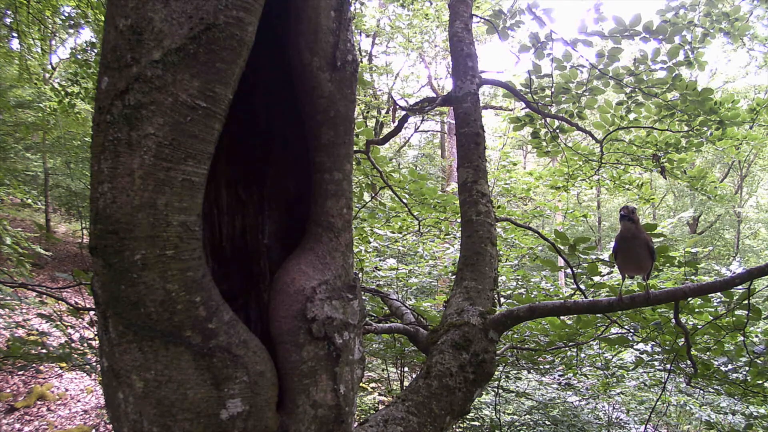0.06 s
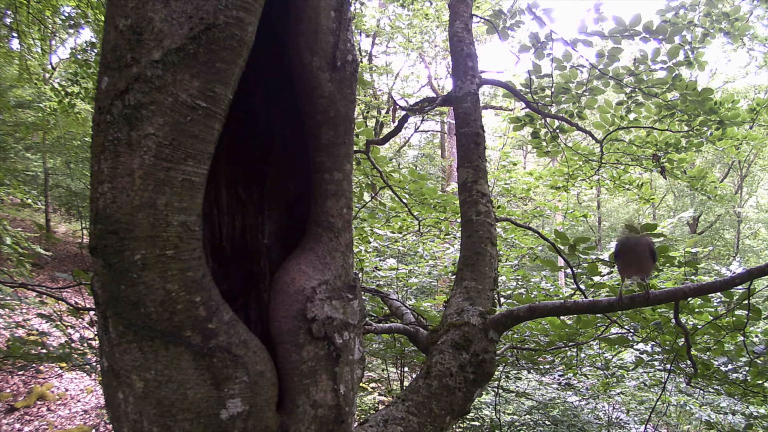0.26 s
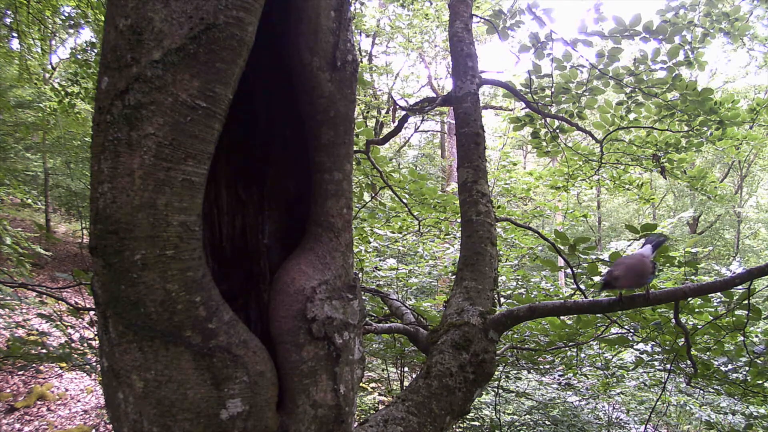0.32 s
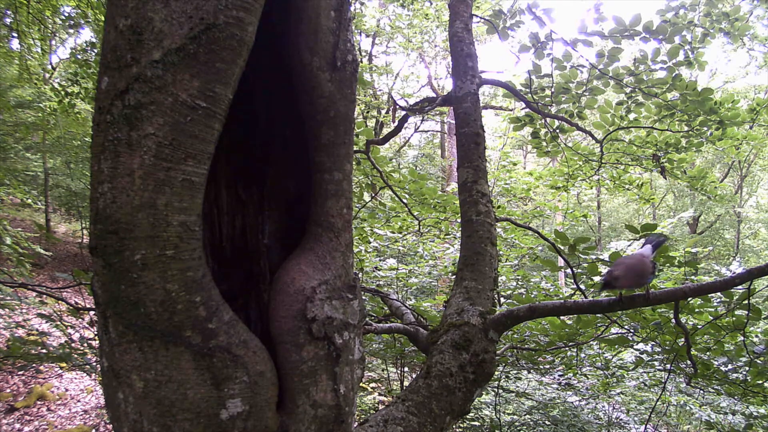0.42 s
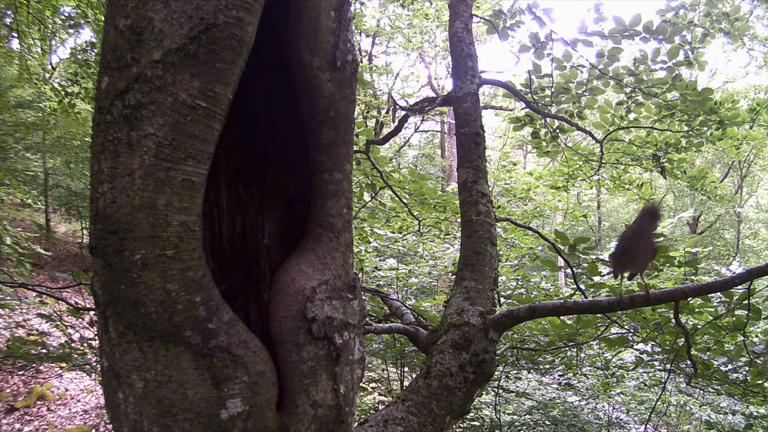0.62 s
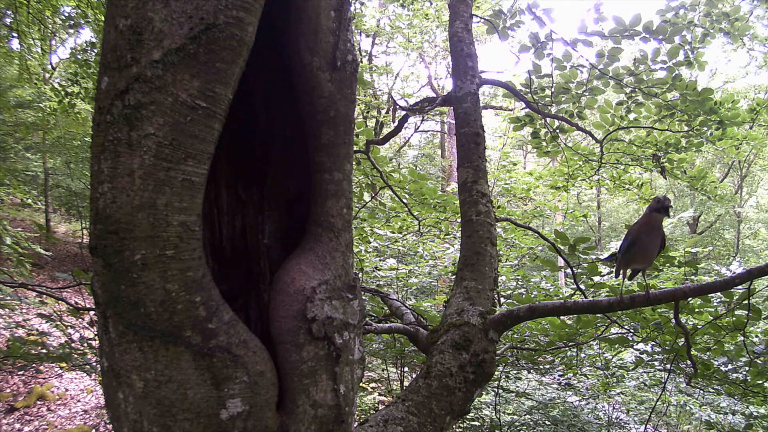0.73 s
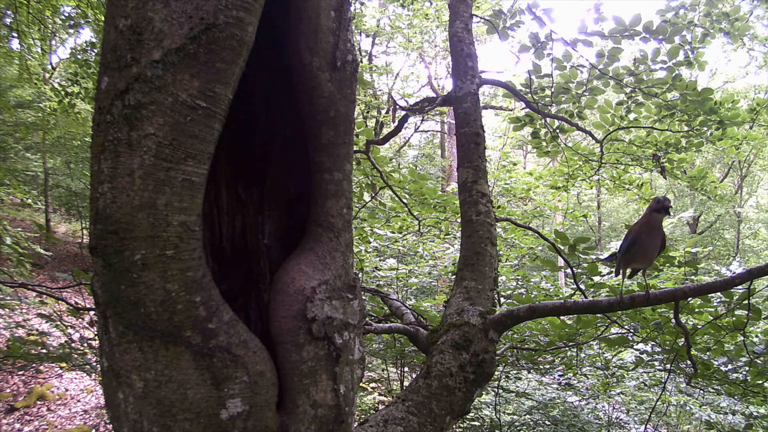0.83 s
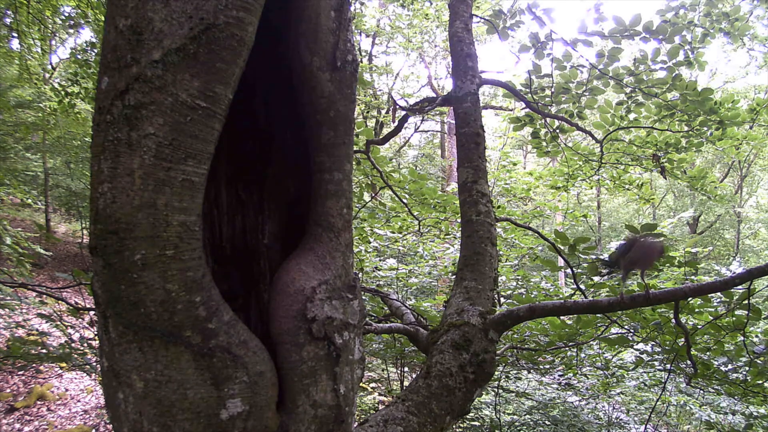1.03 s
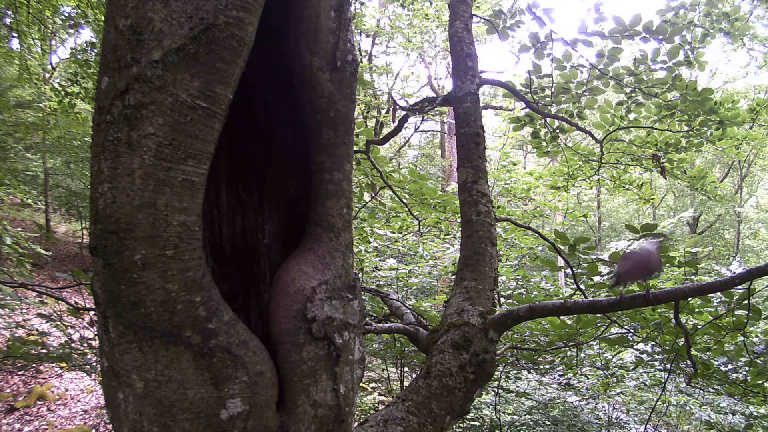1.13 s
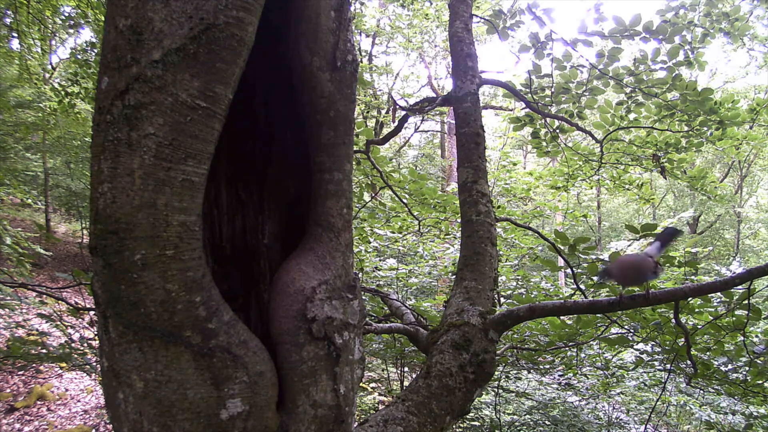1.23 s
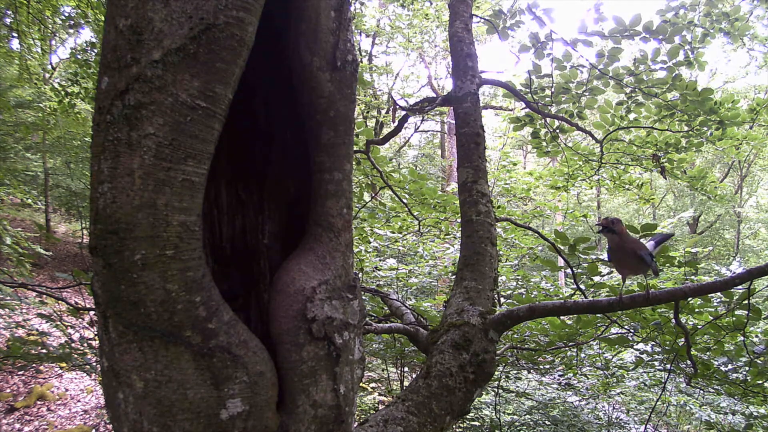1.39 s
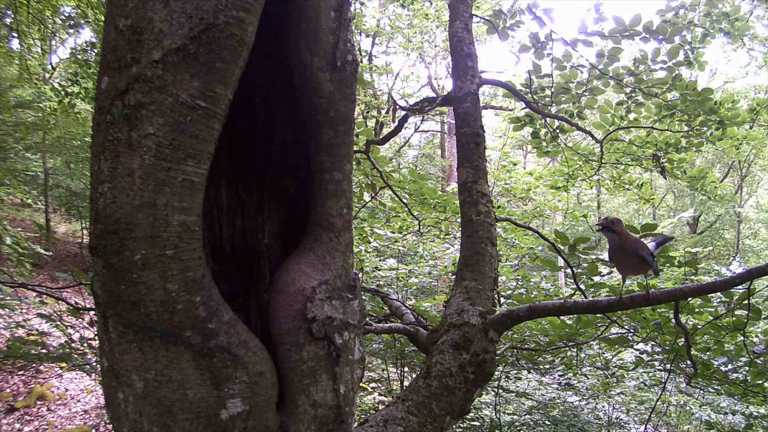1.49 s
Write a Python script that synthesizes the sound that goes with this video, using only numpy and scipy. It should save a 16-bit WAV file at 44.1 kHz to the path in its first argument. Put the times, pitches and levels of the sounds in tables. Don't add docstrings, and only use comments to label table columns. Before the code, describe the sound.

Two rough, grating jay calls, each opening with a brief creak, over very faint forest hiss

```python
import sys
import numpy as np
from scipy import signal
from scipy.fft import rfft, irfft, next_fast_len
from scipy.io import wavfile
from scipy.ndimage import uniform_filter1d, map_coordinates

SR = 44100
rng = np.random.default_rng(int(sys.argv[2]) if len(sys.argv) > 2 else 0)


def put_to_file(sound):
    columns = np.atleast_2d(sound).T
    safe = np.clip(columns, -1, 1)
    whole_steps = np.round(safe * 32767)
    wavfile.write(sys.argv[1], SR, whole_steps.astype(np.int16))


def boost(x):
    u = np.asarray(x, float) / 20
    return 10 ** u


N = 68355


def unit(x):
    return x / np.sqrt(np.mean(x ** 2) + 1e-20)


def along(points, hz):
    f, v = np.transpose(points)
    return np.interp(np.log(hz + 1), np.log(f + 1), v)


def curves(rows):
    s, *cols = np.transpose(rows)
    return [np.interp(np.arange(N) / SR, s, c) for c in cols]


def wobble(rate_hz):
    knots = rng.standard_normal(int(N * rate_hz / SR) + 4)
    return map_coordinates(knots, [np.arange(N) * rate_hz / SR])


def filtered(x, response):
    m = next_fast_len(N + SR // 2)
    return irfft(rfft(x, m) * response(np.fft.rfftfreq(m, 1 / SR)), m)[..., :N]


def shaped(x, points):
    return filtered(x, lambda f: boost(along(points, f)))


def jay():
    # (time [s], pitch [Hz])
    pitch_a = [(.2, 830), (.25, 885), (.3, 893), (.375, 922), (.4, 985), (.46, 1027), (.55, 1036),
               (.615, 1030), (.65, 970)]
    pitch_b = [(.9, 650), (.95, 720), (1, 865), (1.03, 950), (1.075, 987), (1.14, 970), (1.18, 981),
               (1.245, 984), (1.29, 935)]
    # (time [s], level [dB], second membrane share [0-1])
    call_a = [(0.178, -65.5, 0.35), (0.19, -49.5, 0.35), (0.228, -39.5, 0.57), (0.38, -39, 0.49),
              (0.404, -35, 0.41), (0.604, -38, 0.78), (0.652, -46, 0.28), (0.668, -64.5, 0.2)]
    call_b = [(0.834, -62.5, 0.12), (0.852, -55, 0.25), (0.99, -39, 0.77), (1.036, -41.5, 0.12),
              (1.046, -37, 0.18), (1.254, -39, 1), (1.278, -43.5, 0.23), (1.298, -62, 0.25)]
    # (from [s], to [s], second over first pitch [ratio])
    locks = [
        (.46, .63, 13 / 8),
        (1.15, 1.275, 5 / 3),
    ]
    # (start [s], fade [s], puff rate [Hz])
    creaks = [
        (.1745, 0.051, 179.8),
        (.8305, 0.048, 171.3),
    ]
    locked_gains = [0.061, 0.25]
    first = screech(pitch_a, call_a, locks[0], creaks[0], locked_gains[0])
    return first + screech(pitch_b, call_b, locks[1], creaks[1], locked_gains[1])


def screech(pitch, rows, lock, onset, locked_gain):
    # (time [s], turbulence [0-1])
    roughness = [(.17, .9), (.215, .8), (.25, .36), (.37, .3), (.42, .26), (.47, .27), (.6, .3), (.645, .9),
                 (.83, .95), (.9, .85), (.94, .6), (1.01, .5), (1.04, .24), (1.145, .25), (1.16, .12),
                 (1.24, .17), (1.29, .9)]
    t = np.arange(N) / SR
    (hz,), (level_db, share), (rough,) = curves(pitch), curves(rows), curves(roughness)

    usual_first_hz, usual_second_hz, pull = 972.2, 1611, 0.3
    locked = uniform_filter1d(1. * (t > lock[0]) * (t < lock[1]), size=400)
    hz = hz + 16 * rough * wobble(120)
    free_hz = usual_second_hz + pull * (hz - usual_first_hz) + 20 * wobble(150)
    locked_hz = lock[2] * hz + 5 * wobble(60)
    second_hz = locked * locked_hz + (1 - locked) * free_hz

    jitter_rad = 0.35
    shake = jitter_rad * rough * wobble(600)
    shake_second = jitter_rad * rough * wobble(600)
    first = membrane(hz, shake, tilt_db=-1, count=8)
    modulator = membrane(second_hz, shake_second, tilt_db=-1.5, count=4)
    alone = membrane(second_hz, shake_second, tilt_db=-19, count=4)
    tone = first * (1 + share * modulator) + (0.26 + locked_gain * locked) * share * alone

    shimmer_db = 3.5
    flow = np.sqrt(1 - rough ** 2) * unit(tone)
    flow = boost(shimmer_db * rough * wobble(260)) * flow + rough * breath(rough)

    steady = np.sqrt(np.abs(uniform_filter1d(filtered(flow, tract) ** 2, size=700)))
    sounding = (t > onset[0]) * np.clip((rows[-1][0] + .01 - t) / 0.013, 0, 1)
    return filtered(flow / steady * creak(*onset) * boost(level_db) * sounding, tract)


def membrane(hz, shake_rad, tilt_db, count):
    spread_rad = 0.495
    phase = 2 * np.pi * np.cumsum(hz) / SR + shake_rad
    return unit(sum(boost(tilt_db * k) * np.cos((k + 1) * phase - spread_rad * k * k) for k in range(count)))


def breath(rough):
    # (frequency [Hz], gain [dB])
    croak_gain = [(900, 18), (1500, 10.5), (3000, 5), (4500, -8.5), (8000, 2.5)]
    # (frequency [Hz], gain [dB])
    running_gain = [(700, -15.5), (1500, -2), (3000, 8.5), (8000, 15.5)]
    slack_from = 0.26
    slack = np.clip((rough - slack_from) / (1 - slack_from), 0, 1)
    white = rng.standard_normal(N)
    return slack * shaped(white, croak_gain) + (1 - slack) * shaped(white, running_gain)


def creak(start_s, fade_s, puff_hz):
    decay, scatter_cycles = 1.1, 0.14
    u = np.arange(N) / SR - start_s
    cycle = (puff_hz * u + scatter_cycles * wobble(130) * np.clip(u * puff_hz, 0, 1)) % 1
    opening = np.clip(np.minimum(cycle * 12, (.95 - cycle) * 4), 0, 1)
    puff = unit(opening * np.exp(-decay * cycle))
    depth = np.clip(2 - u / fade_s, 0, 1)
    return depth * puff + 1 - depth


def tract(f):
    # (frequency [Hz], width [Hz])
    resonances = [(970, 49), (1400, 193), (1800, 432), (2480, 120), (3050, 426), (4250, 522), (4560, 230),
                  (5300, 750), (6250, 636), (7400, 800)]
    # (frequency [Hz], width [Hz])
    dips = [(1065, 100), (1290, 240), (2400, 1130), (2475, 60), (3700, 1017), (4450, 640), (4940, 70),
            (5800, 770), (6700, 1100), (8200, 1300)]
    # (frequency [Hz], gain [dB])
    beak_gain = [(300, -29), (700, -20), (1200, -9), (2500, -2), (4500, 18), (6000, 12), (7600, -4.5),
                 (8300, -25.5)]

    def pair(centre_hz, width_hz):
        return (centre_hz ** 2 - f * f + 1j * f * width_hz) / centre_hz ** 2

    ratios = [pair(*dip) / pair(*peak) for peak, dip in zip(resonances, dips)]
    return np.prod(ratios, axis=0) * boost(along(beak_gain, f))


def trunks(x):
    # (frequency [Hz], t60 [s])
    decay = [(500, 0.73), (2500, 0.2), (4500, 0.49), (8000, 1)]
    level_db, delay_s = -24, 0.0033
    hz, t, z = signal.stft(rng.standard_normal(SR // 2), SR, nperseg=256)
    tail = signal.istft(z * boost(-60 * t / along(decay, hz)[:, None]), SR, nperseg=256)[1]
    delayed = np.pad(x, (int(delay_s * SR), 0))
    return boost(level_db) * signal.fftconvolve(delayed, tail / np.linalg.norm(tail))[:N]


def nudges():
    # (time [s], length [s], frequency [Hz], level [dB])
    bumps = [
        (0.517, .05, 183, -71),
        (0.995, 0.011, 54.7, -61.5),
        (1.446, 0.057, 99.6, -73.5),
        (1.519, 0.013, 45, -67),
    ]
    t = np.arange(N) / SR

    def band(hz):
        white = rng.standard_normal(N)
        return unit(filtered(white, lambda f: np.exp(-(np.log((f + 1) / hz) / 0.26) ** 2)))

    return sum(boost(db) * np.exp(-((t - s) / length_s) ** 2) * band(hz) for s, length_s, hz, db in bumps)


def leaves():
    # (frequency [Hz], density [dB per Hz])
    spectrum = [(240, -45), (400, -17), (471, -18), (669, -20), (1100, -22.5), (1450, -23.5), (1570, -23.5),
                (6790, -38), (7990, -43.5), (10400, -75), (17600, -120)]
    return boost(-79.5) * unit(shaped(rng.standard_normal(N), spectrum))


def air():
    # (frequency [Hz], density [dB per Hz])
    spectrum = [(8.8, -41), (15, 8), (119, -14.5), (204, -17.5), (251, -19), (407, -29.5), (500, -47),
                (650, -63.5), (1100, -120)]
    level_db, lumps_db = -65, 2
    rumble = unit(shaped(rng.standard_normal(N), spectrum))
    return boost(level_db) * unit(boost(lumps_db * wobble(6.67)) * rumble)


def scene():
    bird = jay()
    return np.tile(bird + trunks(bird) + nudges() + leaves() + air(), (2, 1))


def roll_off(x):
    return signal.sosfilt(signal.butter(12, 8140, fs=SR, output="sos"), x)


def record(dry):
    mid_db, side_db = -99, -112
    mid, side = rng.standard_normal((2, N)) * boost([[mid_db], [side_db]])
    return roll_off(dry + [mid + side, mid - side])


dry = scene()
out = record(dry)
put_to_file(out)
```